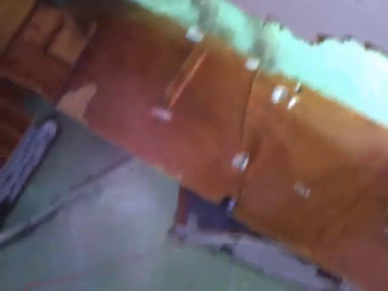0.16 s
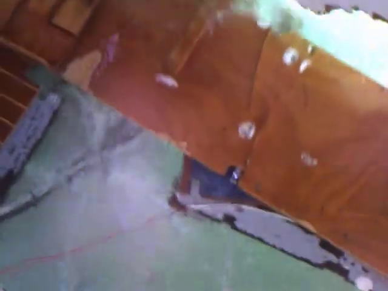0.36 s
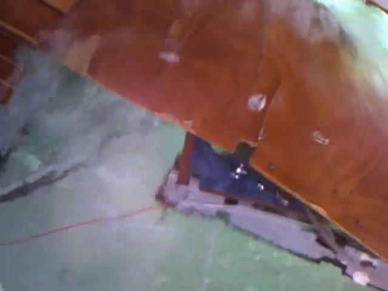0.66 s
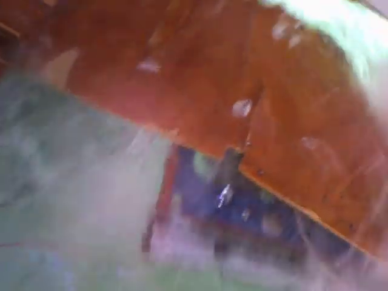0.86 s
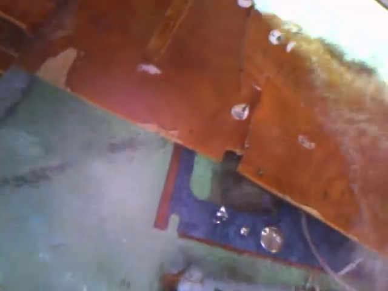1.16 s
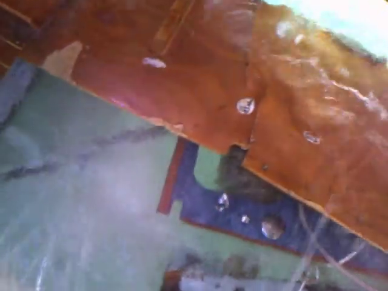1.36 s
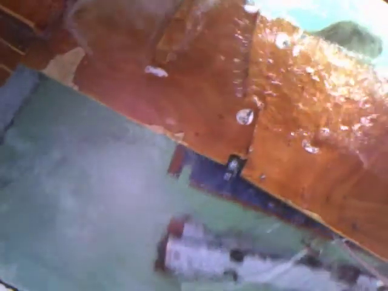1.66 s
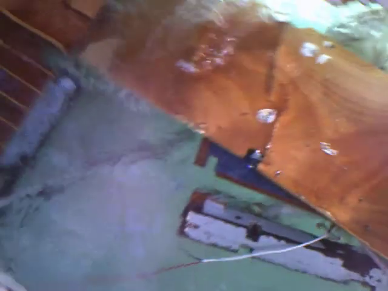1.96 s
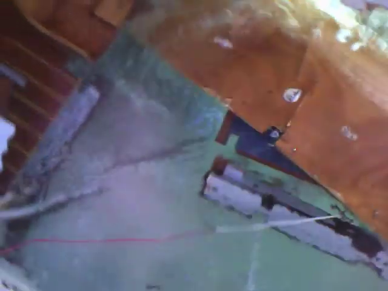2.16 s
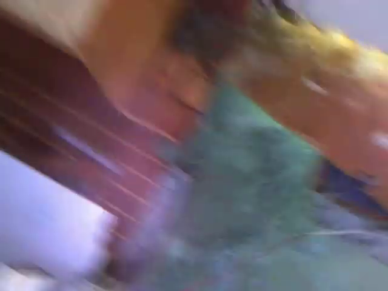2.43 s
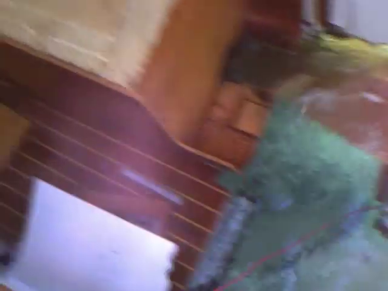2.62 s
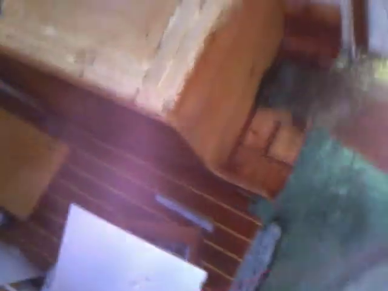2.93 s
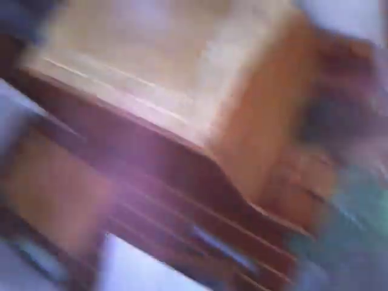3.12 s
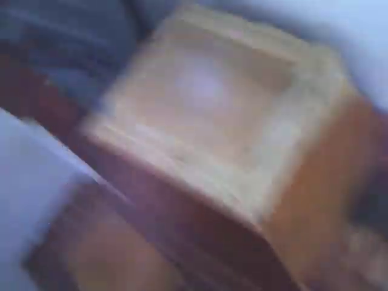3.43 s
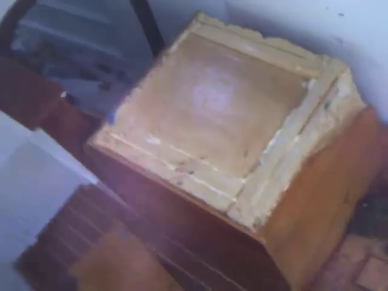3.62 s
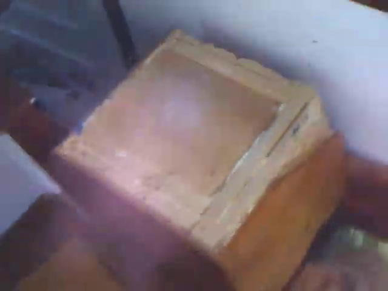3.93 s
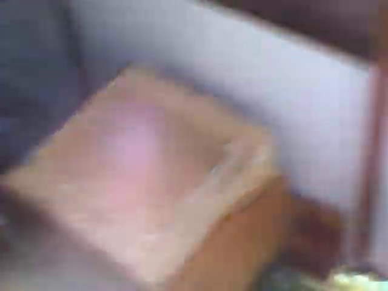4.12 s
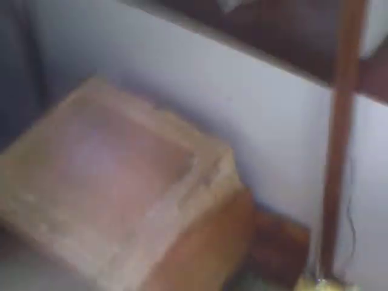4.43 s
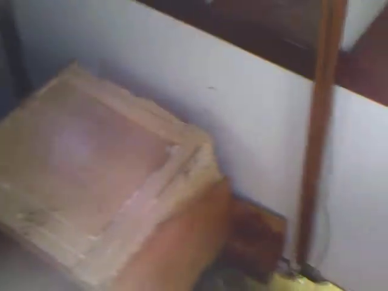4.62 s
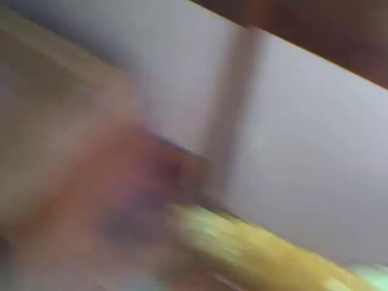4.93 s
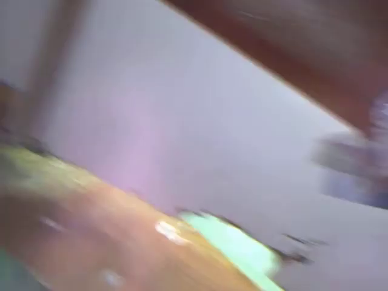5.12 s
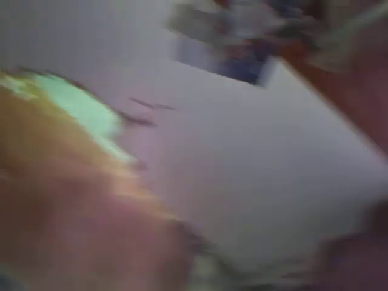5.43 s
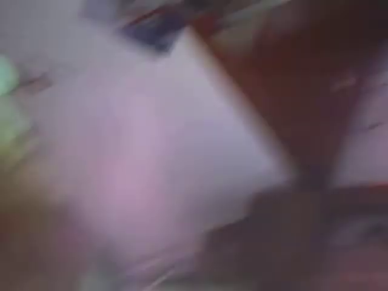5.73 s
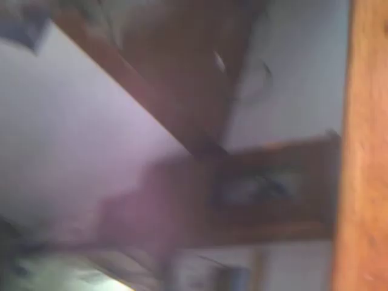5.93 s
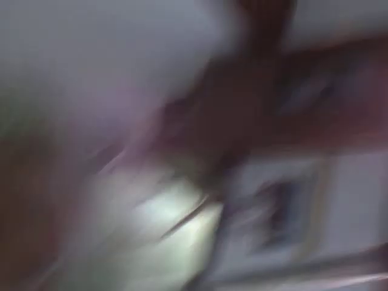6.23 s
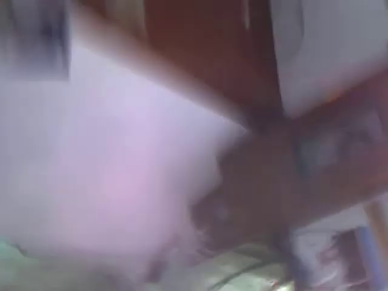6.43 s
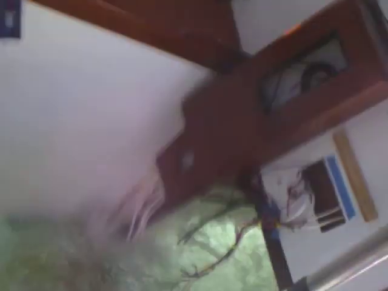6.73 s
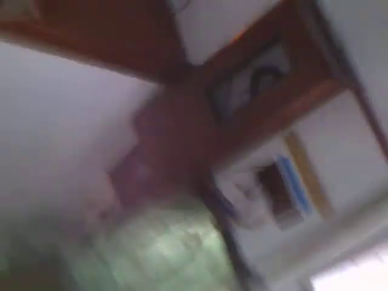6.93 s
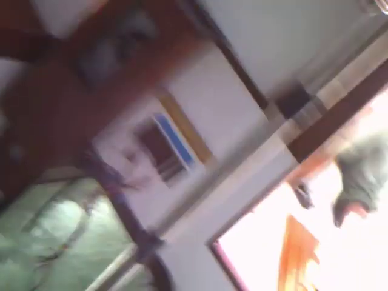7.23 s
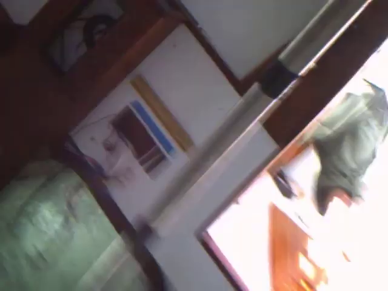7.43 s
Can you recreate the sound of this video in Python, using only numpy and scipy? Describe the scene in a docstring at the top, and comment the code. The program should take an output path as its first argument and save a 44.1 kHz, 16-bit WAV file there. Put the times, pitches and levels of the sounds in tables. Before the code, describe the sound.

Water swells and hisses softly in a wrecked boat, with wind rumble at the microphone. Then evenly spaced blows on timber begin, each a blunt crack, a woody rattle and a short cabin echo, the louder ones distorting. A couple of tiny bubble blips pass between them. In the later part small plastic snaps crowd in, and low thuds through the timber lead into some bangs.

```python
"""Inside a wrecked wooden boat, half full of water, on a small camera: water washes about in flickering noise
bands and wind rumbles at the microphone. From 1.4 s a hand tool strikes the hull in steady blows: noise
rattles the plank modes and the cabin echoes in noise bands. Bubbles ring as gliding tones; the case ticks.
At 4.6 s the camera swings round to the other end of the cabin; from 5.3 s some blows send a low noise thud
through the timber ahead of the bang. The camera is dull and overloads on the blows."""
import sys
import numpy as np
from scipy import signal
from scipy.io import wavfile
from scipy.ndimage import uniform_filter1d

SR = 44100
rng = np.random.default_rng(int(sys.argv[2]) if len(sys.argv) > 2 else 0)


def boost(x):
    """Linear amplitude factor 10**(x/20) for a level x in decibels (scalar or array-like)."""
    u = np.asarray(x, float) / 20
    return 10 ** u


def to_wav(sig):
    """Store sig (one row per channel, or 1-D mono) as 16-bit WAV at the path in sys.argv[1].

    Samples outside -1..1 are clipped; the rate is SR.
    """
    pcm = np.clip(np.atleast_2d(sig), -1, 1) * 32767
    pcm = np.round(pcm).astype(np.int16)
    wavfile.write(sys.argv[1], SR, pcm.T)  # frames by channels


N = 333960
TIME = np.arange(N) / SR

# Water in the hull. Each row: time in seconds, wash level in dB, hiss above the wash in dB.
WATER_LEVELS = [(0.0, -36, -4), (0.35, -31.5, 0.5), (0.51, -29, 2), (0.96, -26, 3), (1.42, -28.5, 0.2),
                (1.7, -26.5, -0.5), (2.6, -29, -2.5), (2.9, -29, -2.5), (3.45, -34.5, -0.4),
                (3.75, -33.5, -4), (4.0, -36, -2.5), (4.85, -36, 0.5), (5.1, -34, -0.7), (5.5, -36.5, 6),
                (5.7, -29, -4), (5.97, -30, 12.5), (6.13, -24, -1.8), (6.35, -28, 5.5), (7.0, -24.5, 6.5),
                (7.3, -27.5, 4)]
# Colour of the water. Each row: frequency in Hz, relative density in dB per Hz.
WATER_SPECTRUM = [(59, -32), (100, -5), (151, -2), (282, -2), (326, -6), (377, -5.5), (748, -4),
                  (2960, -14), (3470, -19.5), (3820, -15), (4550, -41), (5920, -65), (10000, -120)]
# Low rumble at the microphone. Each row: time in seconds, level between swells in dB.
RUMBLE_LEVELS = [(0.0, -32), (0.65, -40), (0.95, -26.5), (1.8, -27.5), (2.5, -31.5), (3.0, -37.5),
                 (3.8, -27.5), (4.7, -39.5), (5.0, -29.5), (5.7, -37), (6.2, -31), (6.8, -35), (7.57, -28)]
# Colour of the low rumble. Each row: frequency in Hz, relative density in dB per Hz.
RUMBLE_SPECTRUM = [(12, -12), (24, -3), (37, -1.5), (55, -10), (90, -12.5), (131, -13), (162, -18),
                   (220, -8), (250, -20), (320, -50), (550, -120)]
# Swells of low rumble, from gusts or from the hull shaking under a blow.
# Each row: time of the top in seconds, rise in dB, half length in seconds.
RUMBLE_SWELLS = [(0.14, 10, 0.059), (0.32, 11.5, 0.089), (1.475, 0.5, 0.092), (2.017, 5.5, 0.062),
                 (2.306, 10.5, 0.13), (2.69, 11, .1), (3.166, 6, 0.062), (3.592, 7, 0.039),
                 (4.277, 11, 0.073), (4.893, 2, .08), (5.82, 17.5, 0.052), (6.21, 8, 0.042),
                 (6.45, 7.5, 0.06), (6.815, 14, .04), (6.92, 19, 0.077), (7.14, 10, 0.22), (7.49, 5.5, 0.1)]
# Tool on the hull. Each row: start in seconds, strength in dB, middle in dB, treble in dB,
# hold in seconds before the echo starts to fade.
BLOWS = [(1.434, -11, 0.5, -1, 0.015), (1.838, -7.5, -4, -9.5, 0.021), (2.264, -3.5, -11, -16.5, 0.018),
         (2.664, -4, -0.5, -4.5, 0.006), (3.087, -5, -7, -11, 0.028), (3.51, -3.5, -7, -3.5, 0.018),
         (3.918, -9.5, -6.5, 3, 0.015), (4.38, -13, -10, 1.5, 0.015), (4.857, -13.5, 1, -3.5, 0.014),
         (5.306, -9, 4, -3, 0.019), (5.727, -8, 4.5, 0.5, 0.021), (6.148, -5.5, -2, -7.5, 0.0077),
         (6.567, -8.5, -0.5, -2.5, 0.023), (7.022, -7.5, 4.5, 4.5, 0.01), (7.452, -7, 1.5, 0.5, 0.018)]
# Plank modes. Each row: frequency in Hz, level in dB, t60 in seconds before the ring time scale;
# every blow varies frequency and level.
PLANK_MODES = [(162, 0, .45), (210, -4, .22), (255, -3, .2), (320, -4, .18), (365, -3, .18), (435, -1, .18),
               (525, -1, .17), (590, -3, .16), (655, -3, .16), (720, 0, .18), (815, -7, .14),
               (905, -8, .14), (1065, -9, .13), (1190, -7, .13), (1270, -8, .12), (1345, -6, .12),
               (1460, -6, .12), (1565, -7, .11), (1700, -8, .11), (1820, -8, .1), (2050, -13, .1),
               (2390, -13, .09)]
# Cabin echo bands. Each row: frequency in Hz, relative density in dB per Hz,
# t60 in seconds before the ring time scale.
CABIN_ECHO = [(118, -25.5, 0.85), (180, -5.5, 0.64), (279, -2.5, 0.28), (435, -2, 0.33), (641, -2.5, 0.33),
              (925, -7.5, 0.22), (1300, -7.5, 0.37), (1710, -12, 0.28), (2623, -17, 0.32),
              (3340, -42, 0.12), (4300, -38, .3)]
# The two camera positions. Each row: build-up in seconds (at least 0.001 is used), ring time scale,
# bass in dB, boom of the lowest plank in dB, crack in dB.
BEFORE_TURN = (-0.12, 0.8826, -0.4, 4, 13.5)
AFTER_TURN = (0.016, 0.9156, 1.5, -2.6, 8)
TURN_S = 4.6  # the camera swings round to the other end of the cabin
FULL_BLOW_DB, BOOM_PER_DB = -10.5, 3.3  # blows weaker than a full one boom less
KNOCK_DB, KNOCK_S = 1.48, 0.0055  # unevenness of the echo: rms spread and smoothing length
# Bubbles. Each row: start in seconds, level in dB, starting pitch in Hz, t60 in seconds.
BUBBLES = [(2.118, -11.5, 1300, 0.032), (2.955, -29.5, 756, 0.49), (3.755, -10.5, 1450, 0.02)]
# Ticks of the case. Each row: start in seconds, level in dB, lift of the case modes below 2 kHz in dB.
TICKS = [(2.2553, -10, 11), (2.2633, -7, 11), (2.3701, -9.5, -2), (5.1255, -6, -5), (5.6353, -6, -2),
         (5.7653, -1.5, 0.5), (5.8063, -19, -8), (5.8382, -2, -14.5), (5.88, -10.5, -3), (5.925, -9.5, -11),
         (5.9522, -15.5, 3), (6.04, -15.5, 1), (6.0867, -4.5, -7), (6.1416, -12, -8), (6.294, -12.5, 4.5),
         (6.941, -3, -11), (6.975, -13, -14), (7.0826, -6, 9.5)]
# Modes of the camera case. Each row: frequency in Hz, level in dB (varied per tick), t60 in seconds.
CASE_MODES = [(1170, 2, 0.0082), (1640, -6.5, .014), (2285, -8, 0.0058), (2744, 0, 0.011),
              (3320, 3.5, 0.0089), (3640, -5, 0.0098)]
# Thuds through the timber. Each row: start in seconds, level in dB, pitch in Hz, swell to the top in seconds.
THUDS = [(5.264, -12.5, 190, 0.034), (5.699, -18, 205, 0.012), (6.533, -20, 190.4, 0.054),
         (6.995, -24.5, 180, 0.049), (7.414, -20, 178, 0.019)]


def unit(x):
    """Scale to rms 1."""
    return x / np.sqrt(np.mean(x ** 2))


def curve(table):
    """Columns of a time table, one value per sample."""
    s, *columns = np.transpose(table)
    return [np.interp(TIME, s, column) for column in columns]


def band(x, hz, octaves):
    """Band-pass around hz."""
    edge = 2 ** (octaves / 2)
    return signal.sosfilt(signal.butter(2, [hz / edge, hz * edge], "bandpass", fs=SR, output="sos"), x)


def walk(rate):
    """Random levels held 1 / rate seconds and slewed twice."""
    hold = int(SR / rate)
    steps = np.repeat(rng.standard_normal(N // hold + 1), hold)
    return uniform_filter1d(uniform_filter1d(steps, hold), hold)[:N]


def flickering_bands(spectrum, lo_hz, count, flicker_db, rate):
    """Half-octave noise bands that follow a spectrum and flicker each on their own."""
    hz, db = np.transpose(spectrum)
    centres = lo_hz * 2 ** (np.arange(count) / 2)
    gains = boost(np.interp(np.log(centres), np.log(hz), db))
    rows = []
    for centre, gain in zip(centres, gains):
        flicker = boost(flicker_db * walk(rate))
        rows.append(gain * flicker * band(rng.standard_normal(N), centre, 0.43))
    return centres, np.array(rows)


def fade(t, t60):
    """Exponential fade by 60 dB in t60 seconds."""
    return np.exp(-np.log(1000) * t / t60)


def ring(t, hz, t60):
    """One fading mode."""
    return fade(t, t60) * np.sin(2 * np.pi * hz * t)


def add(out, s, sound):
    """Mix a sound in at time s."""
    i = int(s * SR)
    out[i:i + len(sound)] += sound[:len(out) - i]


def water():
    """Wash in flickering bands that surge together; the upper bands have their own level."""
    level_db, hiss_db = curve(WATER_LEVELS)
    hz, rows = flickering_bands(WATER_SPECTRUM, 104.7, count=12, flicker_db=2.8, rate=57)
    # the hiss comes in above 900 Hz and is complete 2.9 octaves higher
    hiss_share = np.clip(np.log2(hz / 900) / 2.9, 0, 1)[:, None]
    wash = np.sum(rows * boost(hiss_share * hiss_db), axis=0) / np.std(rows.sum(axis=0))
    surge_db = 0.81 * walk(23)
    return wash * boost(level_db + surge_db)


def rumble():
    """Low rumble of wind at the microphone; swells, from gusts or the shaken hull, rise and fall evenly in dB."""
    _, rows = flickering_bands(RUMBLE_SPECTRUM, 19.23, count=7, flicker_db=4.5, rate=6.9)
    swell_db = sum(db * np.clip(1 - abs(TIME - s) / half, 0, 1) for s, db, half in RUMBLE_SWELLS)
    return unit(rows.sum(axis=0)) * boost(curve(RUMBLE_LEVELS)[0] + swell_db)


def planks(t, hold, scale, colour, boom_db):
    """Loose boards knock together for a moment, and this rattle drives the fading plank modes."""
    modes = np.zeros(len(t))
    # every blow lands elsewhere: new mode strengths, slightly shifted pitch
    for hz, db, t60 in PLANK_MODES:
        level_luck, pitch_luck = rng.standard_normal(2)
        mode_db = db + colour(hz) + boom_db * (hz < 175) + 3.0 * level_luck
        modes += boost(mode_db) * ring(t, hz * (1 + 0.022 * pitch_luck), t60 * scale)
    rattle = rng.standard_normal(len(t)) * np.exp(-t / (2.8 * hold))
    rattle[:40] += 2.5 * np.hanning(40)  # the firm first contact
    return signal.fftconvolve(modes, rattle)[:len(t)] / np.sqrt(np.sum(rattle ** 2))


def cabin(t, hold, scale, colour, build):
    """The cabin answers in noise bands that build up, hold while the boards rattle, then fade."""
    echo = np.zeros(len(t))
    late = np.maximum(t - hold, 0)
    for hz, db, t60 in CABIN_ECHO:
        # lows come late
        rise = 1 - .4 * np.exp(-t / max(build, .001)) - 0.84 * np.exp(-t * hz / 1.28)
        decay = np.exp(-np.log(1000) * (late / (t60 * scale)) ** 1.124)
        echo += boost(db + colour(hz)) * rise * decay * band(rng.standard_normal(len(t)), hz, 0.58)
    uneven = unit(uniform_filter1d(rng.standard_normal(len(t)), size=int(KNOCK_S * SR)))
    return echo * boost(KNOCK_DB * uneven)


def blows():
    """Each blow is a short noise crack with ringing planks and a cabin echo, coloured by strike and position."""
    out, t = np.zeros(N), TIME[:int(.7 * SR)]
    onset = np.minimum(t / .0012, 1) ** 2
    for s, db, mid_db, top_db, hold in BLOWS:
        build, scale, bass_db, full_db, crack_db = AFTER_TURN if s > TURN_S else BEFORE_TURN
        boom_db = full_db + BOOM_PER_DB * min(db - FULL_BLOW_DB, 0)

        def colour(hz):
            """Tone of this blow in dB at hz."""
            return np.interp(np.log(hz), np.log([180, 550, 1300, 3200]), [bass_db, 0, mid_db, top_db])

        hull = boost(-12.5) * planks(t, hold, scale, colour, boom_db)
        echo = boost(18) * cabin(t, hold, scale, colour, build)
        burst = rng.standard_normal(len(t)) * np.exp(-t / .007)
        crack = boost(crack_db + 0.16 * top_db) * band(burst, 1000, 1.8)
        add(out, s, boost(db) * onset * (hull + echo + crack))
    return out


def bubbles():
    """Air bubbles ring and glide up a little."""
    out, t = np.zeros(N), TIME[:int(.2 * SR)]
    for s, db, hz, t60 in BUBBLES:
        add(out, s, boost(db) * np.minimum(t / 0.0057, 1) * ring(t, hz * (1 + 0.14 * t), t60))
    return out


def ticks():
    """Short dry snaps: a scrape of a millisecond or two rings the plastic case for a few cycles."""
    out, t = np.zeros(N), TIME[:int(.05 * SR)]
    for s, db, low_db in TICKS:
        case = np.zeros(len(t))
        for hz, mode_db, t60 in CASE_MODES:
            luck_db = 2.1 * rng.standard_normal()
            case += boost(mode_db + luck_db + low_db * (hz < 2000)) * ring(t, hz, t60)
        snap = band(rng.standard_normal(len(t)) * np.exp(-t / 0.00051), 1940, 1.97)
        add(out, s, boost(db) * np.minimum(t / 0.0011, 1) * (boost(1.5) * case + boost(19) * snap))
    return out


def thuds():
    """Low bending waves in the timber swell for a few cycles before the bang comes through the air."""
    out, t = np.zeros(N), TIME[:int(.2 * SR)]
    for s, db, hz, swell in THUDS:
        shape = (t / swell) ** 2 * np.exp(2 - 2 * t / swell)
        add(out, s, boost(db) * shape * unit(band(rng.standard_normal(len(t)), hz, 0.63)))
    return out


def scene():
    """All sources at one microphone."""
    return (water() + rumble() + blows() + bubbles() + ticks() + thuds())[None]


def top_cut(x):
    """Nothing passes above the cut-off."""
    return signal.sosfilt(signal.butter(12, 16500, fs=SR, output="sos"), x)


def record(dry):
    """The port rings, the preamp overloads, a narrow converter rolls off the top, then overshoots clip flat."""
    port = dry + boost(-7.5) * band(dry, 3480, 0.32)
    overloaded = np.clip(port, -.85, .85)
    dull = signal.sosfilt(signal.cheby1(4, .5, 3650, fs=SR, output="sos"), overloaded)
    narrow = signal.sosfilt(signal.ellip(8, .5, 85, 4300, fs=SR, output="sos"), dull)
    flat = np.clip(narrow, -.715, .715)
    soft = signal.sosfilt(signal.butter(1, 10000, fs=SR, output="sos"), flat)
    return top_cut(soft)


dry = scene()
out = record(dry)
to_wav(out)
```